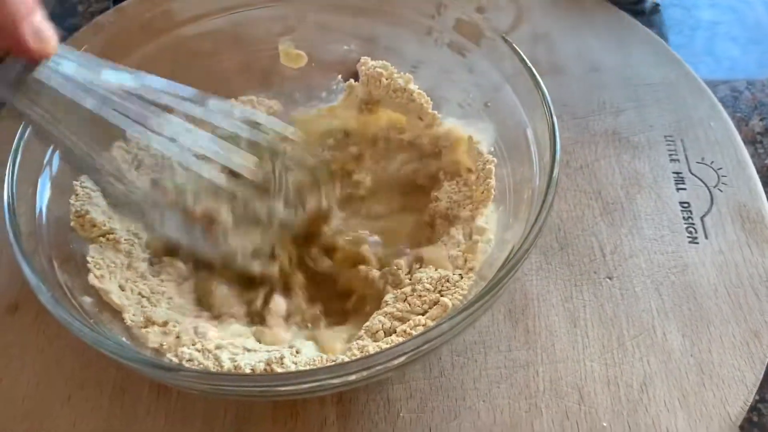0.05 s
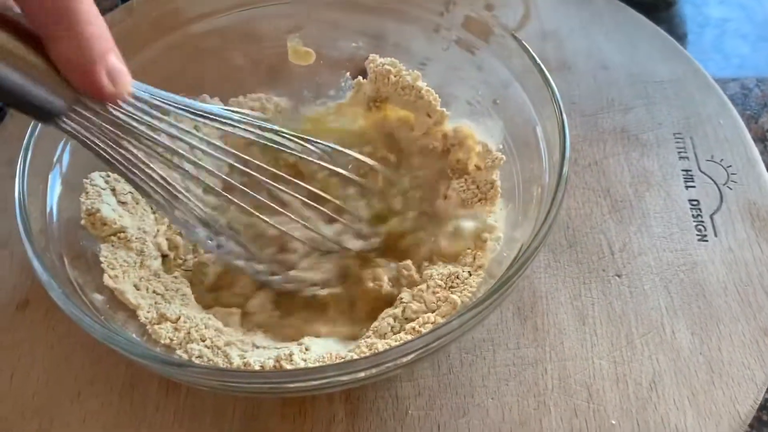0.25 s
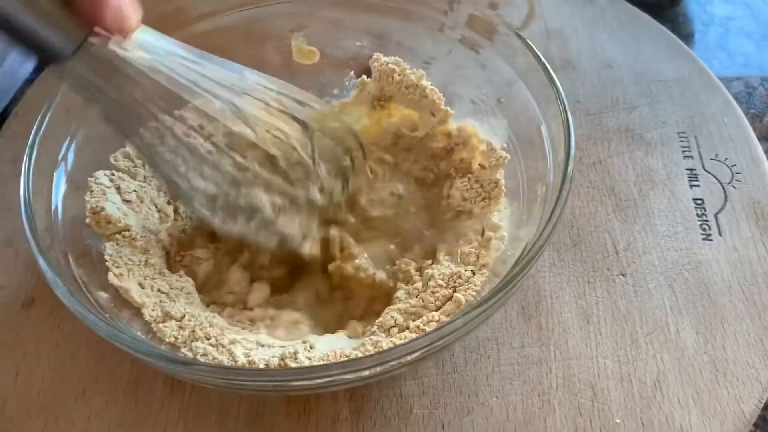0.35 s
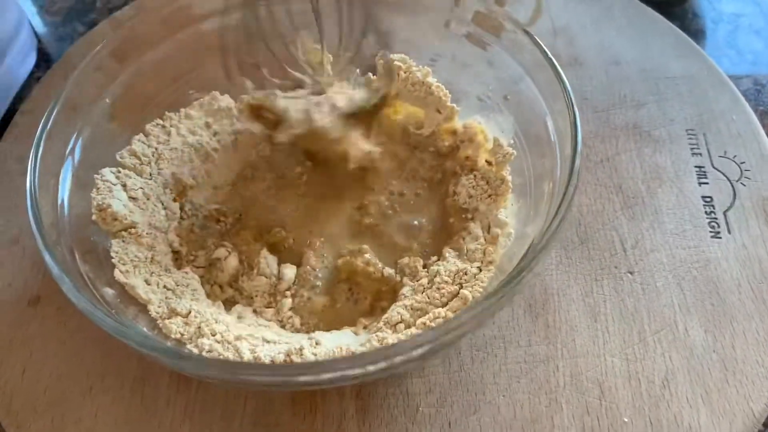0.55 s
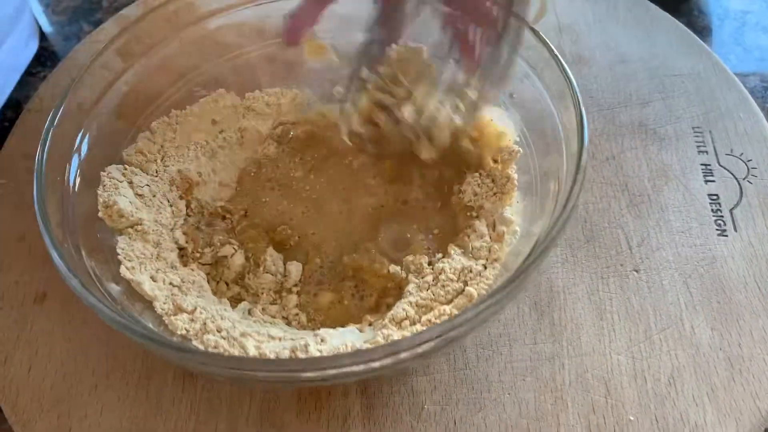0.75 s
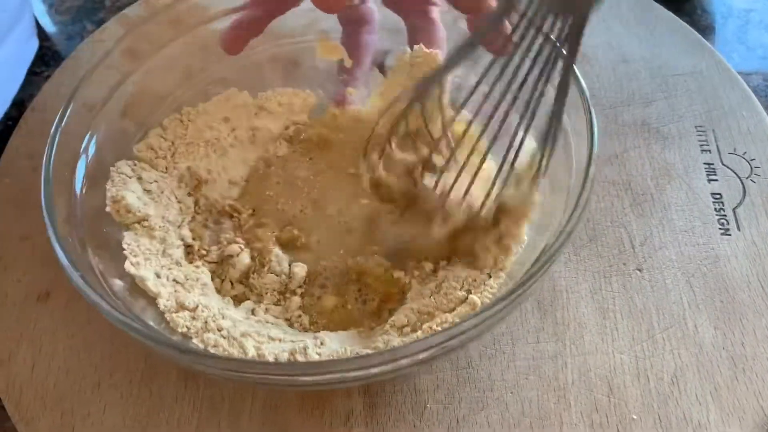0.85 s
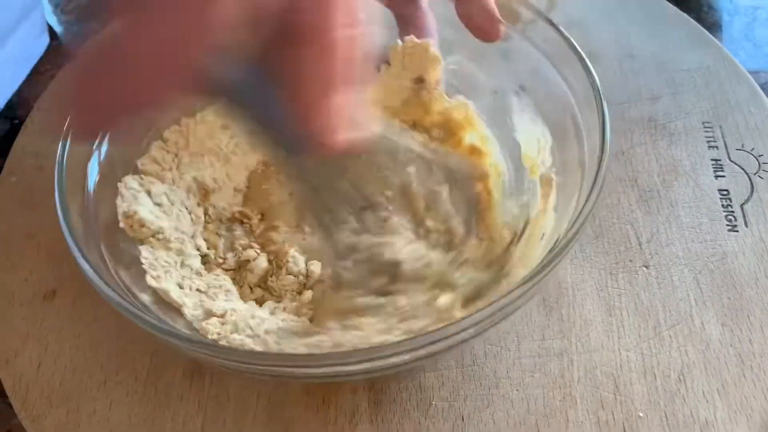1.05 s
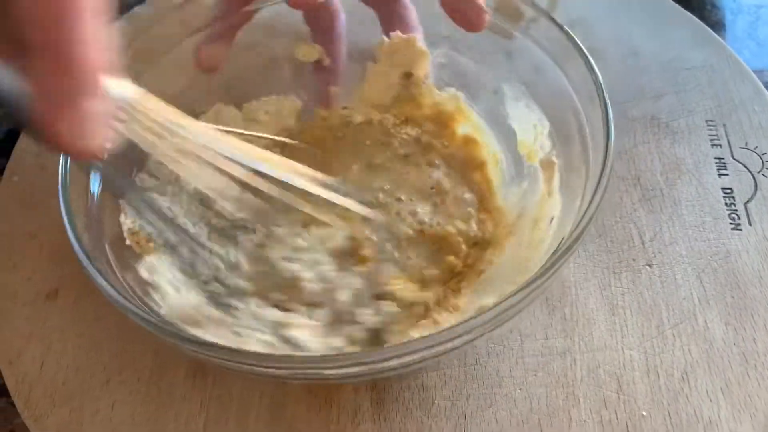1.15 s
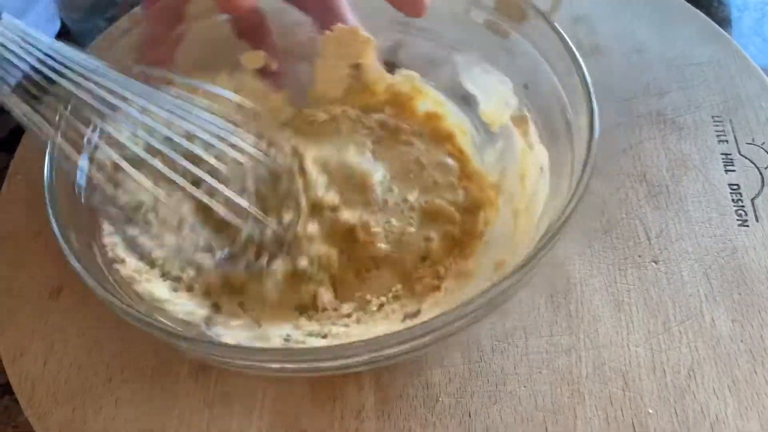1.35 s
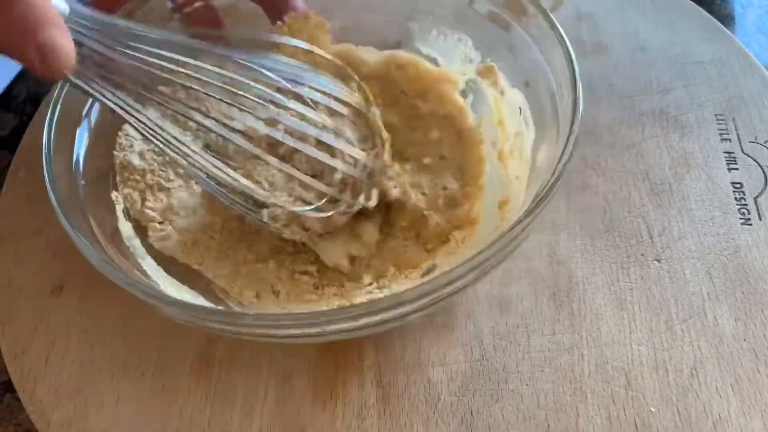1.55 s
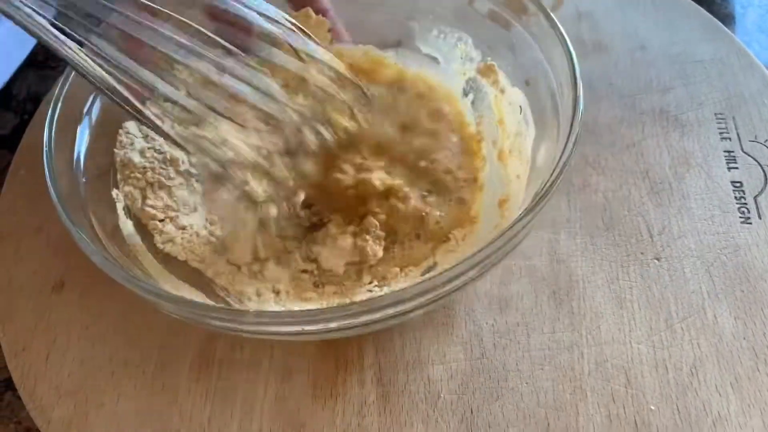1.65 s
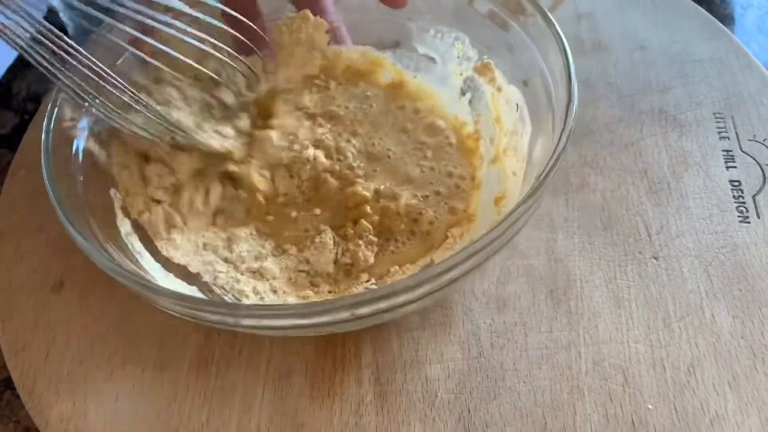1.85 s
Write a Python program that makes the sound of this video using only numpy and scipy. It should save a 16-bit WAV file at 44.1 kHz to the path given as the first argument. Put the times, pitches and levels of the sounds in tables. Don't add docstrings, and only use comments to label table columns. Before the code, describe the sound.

A glass mixing bowl clatters and thuds on a wooden board while a wire whisk scrapes batter

```python
import sys
import numpy as np
from scipy import signal
from scipy.fft import rfft, irfft
from scipy.io import wavfile
from scipy.ndimage import uniform_filter1d

SR = 44100
rng = np.random.default_rng(int(sys.argv[2]) if len(sys.argv) > 2 else 0)


def natural_amplitude(level_db):
    exponent = np.asarray(level_db, float) / 20
    return 10 ** exponent


def bounce(signal):
    frames = np.transpose(np.atleast_2d(signal))
    limited = np.clip(frames, -1, 1)
    pcm = np.round(limited * 32767).astype(np.int16)
    wavfile.write(sys.argv[1], SR, pcm)


N = 83790

# mode_hz, level_db, t60_s
SOFT_BOARD = [(73.3, -12.5, .2), (166.5, -7.5, 0.073), (192.9, 1, 0.21), (240, -3.5, 0.12),
              (325, 2.5, 0.078), (418, -2.5, .06), (508, -5, 0.069), (617, 6, 0.14), (703, -8, 0.038),
              (1170, -9, 0.054)]


def evened(x):
    return x / np.sqrt(np.mean(x ** 2) + 1e-20)


def peaked(x, db):
    return natural_amplitude(db) * x / abs(x).max()


def read(points, hz):
    f, value = np.transpose(points)
    return np.interp(np.log(hz + 1), np.log(f + 1), value)


def colour(x, points):
    gain = natural_amplitude(read(points, np.fft.rfftfreq(x.shape[-1], 1 / SR)))
    return irfft(rfft(x) * gain, x.shape[-1])


def add(mix, s, sound):
    part = mix[max(round(s * SR), 0):][:len(sound)]
    part += sound[:len(part)]


def ring(modes, spread=0., damp=0.88):
    t = np.arange(SR // 3) / SR
    hz, db, t60 = np.transpose(modes)[:, :, None]
    neighbour = (np.arange(5) > 0)[:, None, None]
    off, turn = rng.uniform(-1, 1, (2, 5, len(hz), 1)) * neighbour
    size = natural_amplitude(db - 60 * t / np.clip(damp * t60, .01, .3)) * np.where(off == 0, 1, .55)
    sines = np.sin(2 * np.pi * (hz * (1 + spread * off) * t + turn))
    out = (size * sines).sum((0, 1)) * np.minimum(t / 0.000077, 1)
    return out / abs(out).max()


def earlier_ring():
    # mode_hz, level_db, t60_s
    old_modes = [(590, -7, 0.41), (760, -2.5, 0.32), (826, -5, .1), (1135, 0.5, 0.42), (1640, -10, .2)]
    out = np.zeros(N)
    add(out, 0, peaked(ring(old_modes, 0.024), -48.5))
    return out


def grains(per_s, spread_db):
    sign = rng.choice([-1., 1.], N)
    size = natural_amplitude(spread_db * np.minimum(rng.exponential(1, N), 4))
    return sign * size * (rng.random(N) < per_s / SR)


def drag():
    # time_s, slide_db, crunch_db
    strokes = [(0, -63.5, -72), (0.157, -60.5, -63.5), (.3, -47.5, -101), (.5, -58, -70.5), (.75, -54, -66),
               (.87, -63.5, -76.5), (.99, -69, -72.5), (1.07, -63, -63.5), (1.17, -62, -75.5),
               (1.2, -63, -74), (1.25, -57, -74.5), (1.383, -50.5, -72), (1.5, -66, -79.5),
               (1.58, -92.5, -75.5), (1.702, -85.5, -85.5), (1.9, -61, -86.5)]
    # pitch_hz, level_db
    slide_tone = [(30, -32), (70, -6), (200, 2), (600, 0.5), (1200, -6), (2000, -12), (4000, -65.5),
                  (8000, -75)]
    # pitch_hz, level_db
    crunch_tone = [(1200, -25.5), (2500, 3), (4500, -0.5), (8000, 0), (15500, -14)]
    slips_per_s, slip_spread_db, slide_ring_db = 2800, 3.5, -14.5
    grains_per_s, grain_spread_db = 12000, 4
    s, slide_db, crunch_db = np.transpose(strokes)
    t = np.arange(N) / SR
    slips = evened(colour(grains(slips_per_s, slip_spread_db), slide_tone))
    board = evened(signal.oaconvolve(slips, ring(SOFT_BOARD))[:N])
    slips = evened(slips + natural_amplitude(slide_ring_db) * board)
    crunch = evened(colour(grains(grains_per_s, grain_spread_db), crunch_tone))
    return natural_amplitude(np.interp(t, s, slide_db)) * slips + natural_amplitude(np.interp(t, s, crunch_db)) * crunch


def ticks():
    # start_s, level_db, low_hz, high_hz, length_s
    touches = [(.01, -61, 4000, 15000, 0.005), (0.074, -45.5, 5760, 14700, 0.00095),
               (0.104, -45.5, 5870, 12400, 0.008), (0.148, -47.5, 3650, 14000, 0.0031),
               (.42, -75, 11000, 15500, 0.0011), (0.519, -48, 4020, 16500, 0.0028),
               (0.593, -45, 4000, 8200, 0.0057), (0.746, -55, 5770, 15100, 0.0052),
               (0.881, -56, 3480, 5500, 0.00081), (0.899, -53.5, 1500, 15200, 0.031),
               (1.013, -43, 4000, 9800, 0.0011), (1.022, -36.5, 1450, 15800, 0.00053),
               (1.066, -46.5, 4000, 14200, 0.0067), (1.395, -48.5, 10700, 15700, 0.0012),
               (1.1884, -29, 2400, 16000, .001), (1.1884, -33, 2450, 3200, .0016),
               (1.1884, -27, 11500, 15500, .001), (1.071, -46, 4000, 15000, .0008),
               (1.04, -53.5, 1440, 6100, 0.022), (1.067, -62, 1500, 6000, 0.0079),
               (1.199, -49.5, 6500, 15500, .06), (1.318, -50, 6500, 12000, 0.00055),
               (1.454, -55.5, 5500, 8000, 0.00075), (1.504, -65.5, 3960, 5200, 0.0011),
               (1.513, -54.5, 8100, 15800, 0.00049), (1.764, -72, 1000, 2470, 0.0019),
               (1.782, -55.5, 1200, 3500, 0.0026), (1.783, -59, 5500, 6800, 0.0088),
               (1.79, -53, 1500, 3430, .004), (1.7905, -45.5, 7000, 15500, 0.0023),
               (1.835, -54, 3000, 15000, 0.046), (1.533, -57, 5060, 8560, 0.0012),
               (1.627, -50.5, 1494, 14650, 0.002)]
    tail_db, tail_s = -37, 0.03
    out, t = np.zeros(N), np.arange(4096) / SR
    f = np.fft.rfftfreq(4096, 1 / SR) + 1
    for s, db, low_hz, high_hz, length in touches:
        grit = rfft(rng.standard_normal(4096))
        noise = irfft(grit / (1 + (low_hz / f) ** 9) / (1 + (f / high_hz) ** 8))
        shape = np.minimum(4 * t / length, 1) * np.exp(-t / length)
        add(out, s - .0005, peaked(noise * (shape + natural_amplitude(tail_db) * np.exp(-t / tail_s)), db))
    return out


def pushes():
    # start_s, level_db, push_length_s
    bumps = [(.235, -32.5, 0.0036), (.53, -41, 0.004), (.646, -62, 0.0022), (.83, -38, 0.0015),
             (.87, -44, 0.0019), (.93, -46.5, .003), (1.29, -43, .0006), (1.33, -43.5, 0.0011),
             (1.48, -47.5, .002), (1.375, -41, 0.0031), (1.42, -43, 0.0026), (1.6, -53, 0.0057),
             (1.802, -44, 0.00012), (1.82, -39, 0.0005)]
    # start_s, level_db, push_length_s
    nudges = [
        (.099, -37.5, 0.00027),
        (.107, -36.5, 0.00021),
        (.114, -31, 0.00016),
        (.124, -35, .0005),
        (.14, -44.5, 0.00039),
    ]
    # mode_hz, level_db, t60_s
    nudge_modes = [(80.6, -10.5, 0.094), (158, -9, 0.16), (475.6, -2, 0.11), (571, -7, 0.062),
                   (727, -9.5, 0.07), (1160, -9, .08), (1570, -15, .06), (1950, -12, 0.05),
                   (2240, -17.5, .06), (3200, -23, .05)]
    out, t = np.zeros(N), np.arange(600) / SR
    for rows, body in (bumps, ring(SOFT_BOARD, 0.046)), (nudges, ring(nudge_modes, 0.0052)):
        for s, db, length in rows:
            push = t * np.exp(-2 * t / length)
            add(out, s, peaked(signal.oaconvolve(push, body), db))
    return out


def knocks():
    # start_s, level_db, contact_length_s, glass_share_db
    first_knocks = [
        (.2015, -36, .004, -36),
        (.2093, -14.5, 0.00026, -25),
        (.228, -18, 0.0056, -27),
        (.25, -24.5, 0.0035, -41.5),
        (.262, -32.5, 0.0011, -27.5),
        (.285, -36.5, 0.008, -37),
    ]
    # mode_hz, level_db, t60_s
    first_board = [(298.6, -4, 0.072), (359, -1, 0.079), (475, -10, 0.089), (580, -10.5, 0.041),
                   (758, -1, 0.046), (859, -1, 0.077), (1142.6, -3, 0.12), (1200, -2.5, 0.12),
                   (1367, -3.5, 0.069), (1719, -4, 0.13), (1987, -6.5, 0.074), (2437, -7.5, 0.11),
                   (2833, -3, 0.026), (3462, -20.5, 0.037)]
    # start_s, level_db, contact_length_s, glass_share_db
    second_knocks = [
        (.353, -26.5, 0.0032, -24),
        (.361, -19.5, 0.0011, -29),
        (.374, -36.5, 0.00081, -20),
        (.405, -36, 0.004, -23),
        (.44, -43, 0.0053, -24),
        (.452, -37, 0.0013, -27),
    ]
    # mode_hz, level_db, t60_s
    shifted_board = [(366, -5.5, 0.053), (558.5, -7.5, 0.2), (757, 0, 0.059), (851.5, 2, 0.039),
                     (1142, 0, 0.13), (1254.6, -2, .08), (1391, -1, 0.12), (1435, -7, 0.15),
                     (1640, -6, .18), (2074, -9, .08), (247.8, -6, .07), (2500, -11, 0.058),
                     (3240, -19.5, 0.092), (3703, -26, 0.15)]
    # mode_hz, level_db, t60_s
    wall_modes = [(7725, -14, .12), (8856, -1, .1), (10850, 0, .09), (11000, -5, .09), (14150, -2, .08),
                  (14450, -1, .08), (15000, -12, .07)]
    # pitch_hz, level_db
    clatter_tone = [(100, -37), (250, -6), (800, 2), (1400, 6), (2600, -7), (4000, -22), (6000, -31),
                    (16000, -45)]
    clatter_db, clatter_t60_s, board_spread, board_rise_s = -6.5, 0.13, 0.012, 0.00044
    out, wall, t = np.zeros(N), ring(wall_modes, 0.019), np.arange(SR // 3) / SR
    rise = np.sin(np.pi / 2 * np.minimum(t / board_rise_s, 1)) ** 2
    fade = natural_amplitude(-60 * t / clatter_t60_s) + 0.59 * np.exp(-t / 0.019)
    for rows, modes in (first_knocks, first_board), (second_knocks, shifted_board):
        board = evened(ring(modes, board_spread))
        for s, db, length, glass_db in rows:
            grit, dense = rng.standard_normal((2, len(t)))
            dense = evened(colour(dense, clatter_tone) * fade)
            contact = (grit[:2000] + 18 * (t[:2000] == 0)) * np.exp(-t[:2000] / length)
            body = rise * (board + natural_amplitude(clatter_db) * dense)
            add(out, s, peaked(signal.oaconvolve(contact, body), db))
            add(out, s, peaked(signal.oaconvolve(contact, wall), db + glass_db))
    return out


def rocks():
    # crest_s, level_db, start_pitch_hz, thud_pitch_share, thud_db
    sways = [
        (.523, -36, 1100, 1.46, -7),
        (.589, -29, 1285, 0.87, 0),
        (0.6232, -28, 880, 0.81, -1),
        (.676, -27, 1278, 0.97, -0.5),
        (0.7098, -35.5, 1200, 0.793, 4),
        (0.7541, -28, 1230, 0.87, -13),
        (.801, -38, 1200, 0.98, -1.5),
    ]
    sweep_s, end_hz, pulse_s, fall_s = .0032, 380, .004, .0011
    slap_s, slap_db, slap_again_db, heel_s = .0058, -2.5, -6, 0.00066
    out, t = np.zeros(N), np.arange(600) / SR
    swell = np.where(t < pulse_s, np.sin(np.pi / 2 * t / pulse_s) ** 1.4,
                     np.exp(-((t - pulse_s) / fall_s) ** 2))
    heel = t * np.exp(-2 * t / heel_s)
    for s, db, start_hz, share, thud_db in sways:
        turns = np.cumsum(end_hz + (start_hz - end_hz) * np.exp(-(t / sweep_s) ** 2)) / SR
        pulse = swell * np.cos(2 * np.pi * (turns - np.interp(pulse_s, t, turns)))
        slap = uniform_filter1d(pulse, size=36)
        thud = ring(np.multiply(SOFT_BOARD, [share, 1, 1]), 0.026)
        add(out, s - pulse_s, peaked(pulse, db))
        add(out, s - pulse_s + slap_s, -peaked(slap, db + slap_db))
        add(out, s - pulse_s + 1.737 * slap_s, peaked(slap, db + slap_again_db))
        add(out, s + 0.00386, peaked(signal.oaconvolve(heel, thud), db + thud_db))
    return out


def clinks():
    # start_s, level_db, brightness_0_to_1
    strikes = [
        (1.7966, -31, 0.83),
        (1.8015, -29, 0),
        (1.81, -34.5, 0.05),
        (1.82, -45.5, 0.08),
    ]
    # mode_hz, level_db, t60_s
    rim_modes = [(507.6, -6.5, 0.14), (2067, 5.5, 0.11), (2124, 6.5, 0.057), (3180, -7, .16),
                 (4000, -12.5, 0.12), (4566, -8, 0.14), (6100, -7, 0.16), (7820, -8.5, 0.19),
                 (9000, -7, 0.093), (9620, 3, 0.087), (10550, -5.5, 0.14), (11660, -6, .1),
                 (13900, -12, .11), (14800, -12, .1)]
    crack_db, crack_s = -13, .005
    out, rim, t = np.zeros(N), ring(rim_modes, .024, .75), np.arange(3000) / SR
    for s, db, bright in strikes:
        grit = signal.lfilter([1, -bright], [1, .5 * (bright - 1)], rng.standard_normal(3000))
        crack = grit * np.exp(-t / crack_s)
        add(out, s, peaked(signal.oaconvolve(crack * np.exp(-t / 0.00069), rim), db))
        add(out, s, peaked(crack, db + crack_db))
    return out


def kitchen_air():
    # pitch_hz, level_db
    hush = [(25, -10), (70, 6), (200, -5), (500, -20), (1000, -18), (2000, -17.5), (5000, -32),
            (15500, -24.5)]
    return natural_amplitude(-70.5) * evened(colour(rng.standard_normal((2, N)), hush))


def kitchen(x):
    # band_hz, t60_s
    decay = [(100, 0.46), (1500, 0.49), (4000, 0.64), (15000, 0.11)]
    taps = np.zeros((2, SR))
    at = np.arange(200, SR - 20, 20)
    places = at + rng.integers(0, 20, (2, len(at)))
    np.put_along_axis(taps, places, rng.choice([-1., 1.], (2, len(at))), 1)
    hz, t, z = signal.stft(taps, SR, nperseg=256)
    tail = signal.istft(z * natural_amplitude(-60 * t / read(decay, hz)[:, None]), SR, nperseg=256)[1]
    tail = tail / np.linalg.norm(tail, axis=1, keepdims=True)
    return signal.fftconvolve(x[None], tail, axes=1)[:, :N]


def ports(x):
    # pitch_hz, level_db
    side_tone = [(60, -13.5), (250, -10), (700, -7.5), (1500, 0.5), (3000, 0), (6000, 0), (9000, -1.5),
                 (13000, -20.5)]
    smear_s = .003
    smear = rng.standard_normal(1024) * np.exp(-np.arange(1024) / SR / smear_s)
    hz, z = np.fft.rfftfreq(N, 1 / SR), rfft(smear, N)
    flat = z / np.sqrt(uniform_filter1d(abs(z) ** 2, size=900))
    return irfft(rfft(x) * flat * natural_amplitude(read(side_tone, hz)), N)


def scene():
    hard = knocks() + earlier_ring()
    small = pushes() + rocks() + clinks() + ticks()
    rub = drag()
    knock_room_db, small_room_db, drag_room_db = -8.5, -18.5, -9
    sent = natural_amplitude(knock_room_db) * hard + natural_amplitude(small_room_db) * small + natural_amplitude(drag_room_db) * rub
    wet = kitchen_air() + kitchen(sent)
    near = hard + small + rub
    mid, side = near + wet[0], ports(near + wet[1])
    return np.array([mid + side, mid - side])


def low_pass(x):
    return signal.sosfilt(signal.butter(12, 16800, fs=SR, output="sos"), x)


def record(dry):
    edge = signal.firwin(255, 15900, window=("kaiser", 8), fs=SR)
    cut = signal.sosfilt(signal.butter(4, 56, "high", fs=SR, output="sos"), dry)
    return low_pass(signal.oaconvolve(cut, edge[None], "same"))


dry = scene()
out = record(dry)
bounce(out)
```